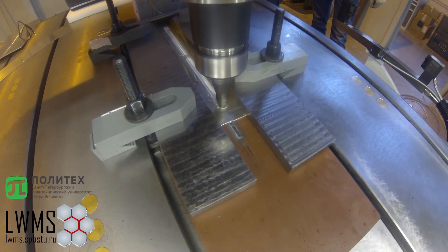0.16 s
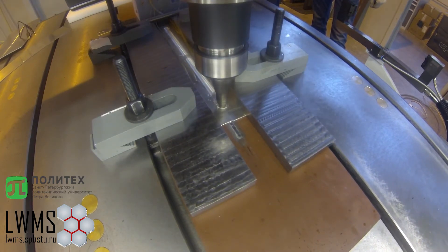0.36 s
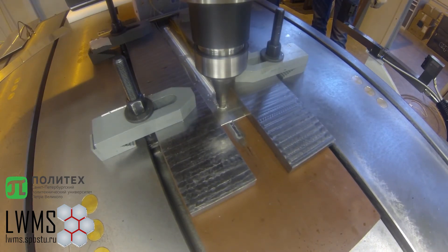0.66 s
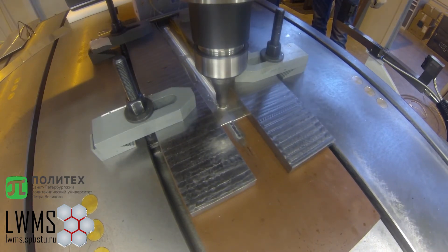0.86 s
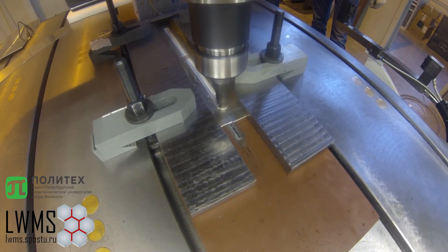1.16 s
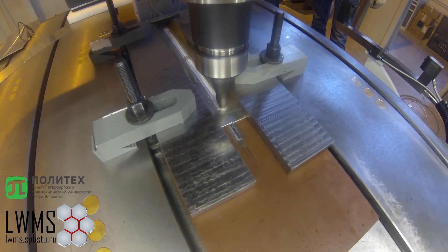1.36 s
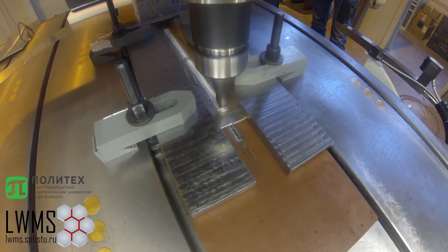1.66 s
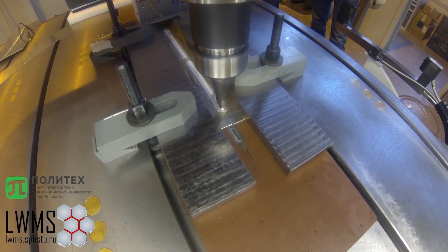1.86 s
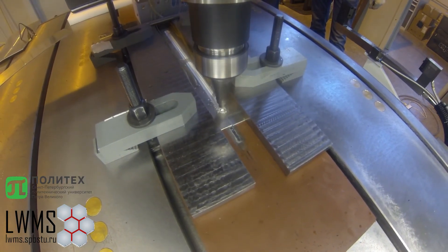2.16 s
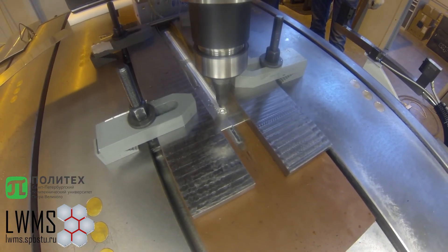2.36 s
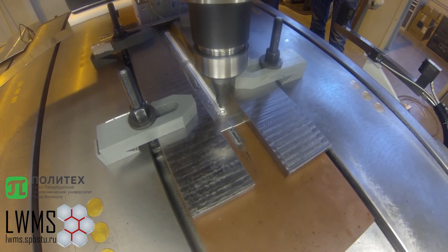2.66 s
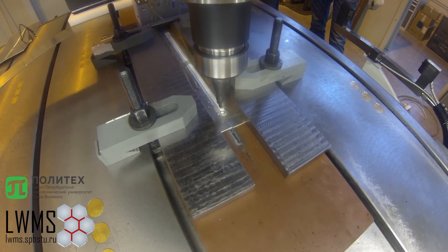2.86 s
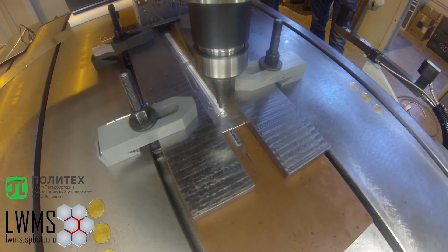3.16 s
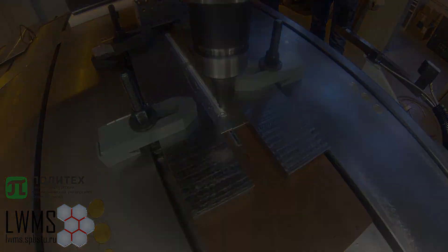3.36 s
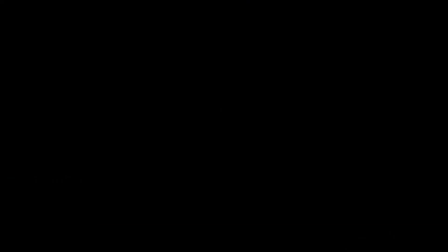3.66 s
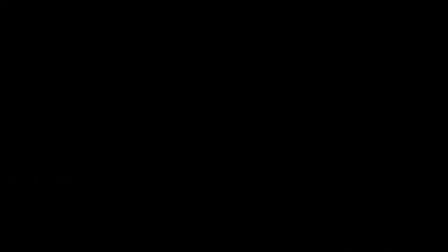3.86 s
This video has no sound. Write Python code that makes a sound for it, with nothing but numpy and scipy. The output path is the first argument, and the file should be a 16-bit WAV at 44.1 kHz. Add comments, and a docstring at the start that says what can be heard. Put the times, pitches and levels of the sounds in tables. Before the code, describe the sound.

A friction welding machine runs close by in a workshop, in mono, with constant bright hiss, fluttering ring and thin whines. A rough high squeal fades until about 3.5 s, then partly returns. The frame shudders low until 0.9 s, when a singing band sags and a jolt falls. A steady low hum grows until 3.2 s, drops in pitch, and a short drive sweep rises and falls at 3.5-3.9 s.

```python
"""Friction stir welding machine

A workshop, heard in mono from close to the tool. Filtered noise makes the hiss, squeal and ringing
of the spindle; wavering sines make its whines. The frame first shudders, then a feed drive hums.
The hum stops as gear tones fall in pitch; a short move then sweeps such tones up and down through
the resonances of the frame. Low jolts, gear noise and faint workshop noise lie underneath."""
import sys
import numpy as np
from scipy import signal
from scipy.fft import rfft, irfft
from scipy.io import wavfile
from scipy.ndimage import uniform_filter1d

SR = 44100
rng = np.random.default_rng(int(sys.argv[2]) if len(sys.argv) > 2 else 0)


def wrap_up_sound(samples):
    """Save the sound to the file named by the first command line argument, as 16-bit audio."""
    columns = np.atleast_2d(samples).T
    # keep every value between -1 and 1, then stretch to whole-number steps
    tamed = np.clip(columns, -1, 1)
    steps = np.round(tamed * 32767).astype(np.int16)
    wavfile.write(sys.argv[1], SR, steps)


N = 176400  # samples, 4 s
SWITCH_S = 0.047  # length of a smooth switch


def amp(db):
    """Decibels to gain."""
    return 10 ** (np.asarray(db) / 20)


def unit(x):
    """Scales to rms 1."""
    return x / np.sqrt(np.mean(x ** 2) + 1e-20)


def clock():
    """Time of every sample, in seconds."""
    return np.arange(N) / SR


def curve(rows, axis=1):
    """One column of a time table, interpolated at every sample."""
    rows = np.array(rows)
    return np.interp(clock(), rows[:, 0], rows[:, axis])


def after(s):
    """Smooth switch from 0 to 1 around time s."""
    return .5 + .5 * np.tanh(2 * (clock() - s) / SWITCH_S)


def drift(width_hz):
    """Random motion of rms 1, made of noise that weakens above width_hz."""
    hz = np.fft.rfftfreq(N, 1 / SR)
    lowpass = (hz > 0) / (1 + (hz / width_hz) ** 2)
    return unit(irfft(rfft(rng.standard_normal(N)) * lowpass, N))


def turn(hz):
    """Unit phasor that follows a frequency from a random starting phase."""
    cycles = np.cumsum(hz * np.ones(N)) / SR
    return np.exp(2j * np.pi * (cycles + rng.random()))


def band(hz, width_hz):
    """Narrow noise of rms 1: a phasor at the centre frequency, randomly modulated."""
    wander = drift(width_hz * .78) + 1j * drift(width_hz * .78)
    return unit((wander * turn(hz)).real)


def tones(rows, flutter=.3):
    """Machine tones that waver in pitch and strength."""
    total = 0
    for hz, db, width_hz in rows:
        tone = unit(turn(hz + .5 * width_hz * drift(width_hz)).real)
        total = total + amp(db) * tone * (1 + flutter * drift(2 * width_hz + 1))
    return total


def noise(points, patch_db, flicker_db, size=1024):
    """Coloured noise of rms 1 with small time-frequency patches and a shared flicker."""
    overlap = size - size // 4
    hz, _, z = signal.stft(rng.standard_normal(N), SR, nperseg=size, noverlap=overlap)
    patches = uniform_filter1d(rng.standard_normal(z.shape), size=8, axis=0)  # across frequency
    patches = unit(uniform_filter1d(patches, size=12, axis=1))  # along time
    f, db = np.transpose(points)
    colour = np.interp(np.log(hz + 1), np.log(f), db)[:, None]
    x = signal.istft(z * amp(colour + patch_db * patches), nperseg=size, noverlap=overlap)[1][:N]
    return unit(x * amp(flicker_db * drift(width_hz=38)))


def reflect(x):
    """Dense short reflections from the table and the workshop comb a sound."""
    t60_s, echo_db = 0.26, -11
    t = np.arange(SR // 2) / SR
    tail = rng.standard_normal(len(t)) * 1000 ** (-t / t60_s)
    tail = tail / np.linalg.norm(tail)
    return unit(x + amp(echo_db) * signal.fftconvolve(x, tail)[:N])


# steady broad hiss of the running machine: f/Hz, relative level/dB per Hz
HISS_COLOUR = [(400, -23.5), (560, -34), (690, -25), (900, -22.5), (1330, -24.5), (1470, -20),
               (2000, -17.5), (2160, -14), (2320, -16), (2850, -8), (3050, -4.5), (3520, -8), (3760, -15),
               (4180, -9), (4800, -12), (5300, -8.5), (5470, -12.5), (5720, -8), (6000, -2.5), (6400, -2),
               (6800, -1), (7130, -19), (7330, -7), (7800, -7), (8520, -18.5), (9000, -12.5), (9650, -21),
               (10450, -10), (10950, -17.5), (11700, -15.5), (12400, -20.5), (12850, -15.5), (13350, -14),
               (13750, -32), (14400, -24), (14750, -18), (15800, -31)]


def hiss():
    """Steady coloured noise of the machine, combed by its reflections."""
    return amp(-32) * reflect(noise(HISS_COLOUR, patch_db=0.88, flicker_db=0.36))


def saturate(x, low_hz, high_hz, count=4):
    """A self-limiting vibration: its strength evens out while its pitch keeps jittering."""
    hz = np.fft.rfftfreq(N, 1 / SR)
    offset = (2 * hz - low_hz - high_hz) / (high_hz - low_hz)  # -1 and 1 at the band edges
    for _ in range(count):
        even = x / (abs(signal.hilbert(x)) + 1e-9)
        x = irfft(rfft(even) / (1 + offset ** 10), N)
    return unit(x)


# rough squeal of the rubbing tool, before it limits itself: f/Hz, relative level/dB per Hz
SQUEAL_COLOUR = [(5000, -47), (5700, -13), (5820, -16.5), (6250, -8), (6430, -11), (6590, 3.5),
                 (6740, -8.5), (6950, -7), (7150, -25), (7550, -10), (8200, -52), (9000, -36)]
# soft rubbing hiss that goes with the squeal: f/Hz, relative level/dB per Hz
RUB_COLOUR = [(5400, -31), (5700, -22), (5850, -1), (6500, -1.5), (7000, -3), (7140, -3), (7320, -2),
              (7560, -2), (7850, -8), (8150, -18), (8800, -35)]
# level of the squeal, which the rubbing follows: t/s, level/dB
SQUEAL_COURSE = [(0, -27), (.4, -26), (1.15, -26.5), (1.9, -29), (2.6, -32), (3.1, -36.5), (3.48, -39.5),
                 (3.62, -33), (3.92, -29), (4, -30)]


def rubbing_tool():
    """The tool squeals as a self-limiting vibration, with a softer rubbing hiss beside it."""
    squeal = saturate(noise(SQUEAL_COLOUR, patch_db=0, flicker_db=0), low_hz=5850, high_hz=7250)
    rub = amp(-9.5) * noise(RUB_COLOUR, patch_db=1, flicker_db=-0.5)
    return amp(curve(SQUEAL_COURSE)) * (squeal + rub)


# singing band, weakening and sagging as it stops: t/s, centre f/Hz, level/dB
SING_COURSE = [(0, 2735, -34.5), (.7, 2740, -38.5), (.79, 2720, -35), (.85, 2630, -43)]


def singing():
    """A narrow noise band sings, then sags in pitch and stops."""
    end_s, width_hz = 0.87, 55
    level = amp(curve(SING_COURSE, axis=2)) * (1 - after(end_s))
    return level * band(curve(SING_COURSE), width_hz)


# fluttering ring of the spindle: t/s, centre f/Hz, level/dB
RING_COURSE = [(0, 3130, -38.5), (1, 3110, -38.5), (2, 3078, -37.5), (3.2, 3087, -38.5), (4, 3010, -36)]


def ringing():
    """The spindle's ring flutters because it is a narrow band of noise."""
    return amp(curve(RING_COURSE, axis=2)) * band(curve(RING_COURSE), width_hz=117)


# hiss band that sinks slowly: t/s, centre f/Hz, level/dB
SINKING_COURSE = [(0, 5300, -50.5), (1.8, 5290, -44.5), (3.1, 5030, -43.5), (3.7, 4910, -42.5),
                  (4, 4780, -41.5)]


def sinking_band():
    """A noise band grows stronger while its centre sinks."""
    return amp(curve(SINKING_COURSE, axis=2)) * band(curve(SINKING_COURSE), width_hz=200)


# steady whines of spindle and pumps: f/Hz, level/dB, width f/Hz
STEADY_WHINES = [(436, -62, 6), (1211, -66, 5), (1400, -67, 8), (1590, -66, 8), (1905, -62, 20),
                 (2025, -57, 6), (2620, -55, 14), (2744, -54, 6), (2800, -52, 4), (2827, -56, 6),
                 (3015, -53, 12), (5600, -51, 4), (6577, -43, 5), (7532, -55, 10), (7720, -45.5, 2)]
# beating pair of whines: f/Hz, level/dB before the course below, width f/Hz
BEATING_PAIR = [(1091.7, -55.5, 13), (1119.6, -58, 5.2)]
# gain on the pair: t/s, level/dB
BEATING_COURSE = [(0, 4.5), (.4, -1), (.9, -1), (4, -3.5)]


def whines():
    """Wavering tones of the spindle and pumps, with two close tones that beat."""
    return tones(STEADY_WHINES) + amp(curve(BEATING_COURSE)) * tones(BEATING_PAIR)


# low workshop noise: f/Hz, relative level/dB per Hz
ROOM_COLOUR = [(10, -8), (30, 9), (90, -12.5), (150, -10), (230, -30), (450, -7.5), (600, -6), (900, -27)]


def room():
    """Faint low noise of the workshop, patchy and flickering."""
    return amp(-51) * noise(ROOM_COLOUR, patch_db=1.5, flicker_db=2.0)


# low shudder of the frame before the feed starts: f/Hz, level/dB, width f/Hz
SHUDDER_TONES = [(23, -38.5, 0.25), (34.77, -49, 2.5), (49.1, -47.5, 5), (70.4, -51.5, 1.5),
                 (105.5, -54.5, 22)]
# frame tones that beat while it shudders: f/Hz, level/dB, width f/Hz
BEATING_STRANDS = [(300.5, -44, 7.8), (333.6, -43.5, 14.5), (354, -49, 12.2)]


def shudder():
    """The frame shakes on low tones and beats on higher ones until it settles."""
    end_s = .95
    return (1 - after(end_s)) * (tones(SHUDDER_TONES, flutter=.1) + tones(BEATING_STRANDS))


# gear noise in the frame's resonance: t/s, level/dB
GEAR_COURSE = [(0, -42), (.85, -39.5), (.95, -45.5), (1.1, -43.5), (2, -47), (3.12, -47), (3.22, -40),
               (3.33, -40.5), (3.41, -47.5), (3.5, -41.5), (3.58, -35.5), (3.78, -38.5), (3.87, -39),
               (3.93, -46.5), (4, -48)]


def gear_noise():
    """Gear noise heard through one resonance of the frame."""
    return amp(curve(GEAR_COURSE)) * band(hz=326.2, width_hz=78.3)


# whines of the engaged drive: f/Hz, level/dB, width f/Hz
DRIVE_WHINES = [(597, -61, 5), (2146, -57, 6), (2157, -53.5, 4), (2167, -58, 8), (2220, -61, 10),
                (2261, -61, 6), (2438, -53, 7)]
# thin whine that sets in with the drive and weakens: t/s, level/dB
THIN_COURSE = [(.83, -57.5), (1.9, -57.5), (3.1, -65.5), (3.4, -65)]


def engaged_drive():
    """The drive sets in with wavering whines and one thin tone that weakens."""
    start_s, thin_hz = 0.78, 821
    thin = amp(curve(THIN_COURSE)) * unit(turn(thin_hz + drift(width_hz=2.6)).real)
    return after(start_s) * (tones(DRIVE_WHINES) + thin)


# low jolts as the axes start and stop: centre t/s, level/dB, length t/s (one sigma)
AXIS_JOLTS = [(0.862, -36.5, 0.031), (1.05, -46, 0.11), (3.449, -41, 0.033), (3.636, -43, 0.064),
              (3.854, -45, 0.032)]


def jolts():
    """Each jolt is a bell-shaped swell of one low, wandering tone."""
    hz, width_hz = 35, 52
    swells = 0
    for s, db, length in AXIS_JOLTS:
        swells = swells + amp(db) * np.exp(-.5 * ((clock() - s) / length) ** 2)
    return swells * unit(turn(hz + .5 * width_hz * drift(width_hz)).real)


# weaker gear tones around the feed hum: f/Hz, level/dB, width f/Hz
FEED_TONES = [(81, -49.5, 0.1), (92.5, -58, 0.17), (253, -63, 1), (273.2, -57, 0.2), (343.8, -50, 1.9),
              (356.8, -57.5, 0.85), (372, -54.5, 1.2)]


def feed_hum():
    """The feed drive hums on one strong tone that slowly grows louder, among weaker gear tones."""
    start_s, end_s = 0.94, 3.19
    hz, waver = 281.3, 0.0012  # waver: rms fraction of the pitch
    level_db = -35.5 + 0.7 * (clock() - 0.5)  # gains 0.7 dB per second
    main = amp(level_db) * unit(turn(hz * (1 + waver * drift(width_hz=9.9))).real)
    return after(start_s) * (1 - after(end_s)) * (main + tones(FEED_TONES))


def resonate(x, hz, width_hz):
    """One fixed mode with a gain of about 1 at its peak."""
    pole = np.exp(-np.pi * width_hz / SR)
    return 2 * signal.lfilter([1 - pole], [1, -pole * np.exp(2j * np.pi * hz / SR)], x).real


# modes of the frame: f/Hz, width f/Hz, level/dB
FRAME_MODES = [(342.3, 19.5, -3), (242, 21, -12.5), (476, 50, -25), (970, 77, -13), (1480, 110, -15)]


def glide(rows, orders):
    """Gliding gear tones boom whenever they cross a mode of the frame."""
    level = amp(curve(rows, axis=2)) * after(rows[0][0]) * (1 - after(rows[-1][0]))
    gears = sum(amp(db) * unit(turn(k * curve(rows)).real) for k, db in orders)
    drive = level * gears
    return sum(amp(db) * resonate(drive, hz, width_hz) for hz, width_hz, db in FRAME_MODES)


# falling drive tone as the hum stops: t/s, pitch f/Hz, level/dB before gears and frame
BRAKE_COURSE = [(3.13, 284.4, -38), (3.21, 272.5, -30), (3.25, 263, -44.5), (3.295, 260.4, -28.5),
                (3.39, 247, -43)]
# its gear tones: multiple of the pitch, level/dB
BRAKE_GEARS = [(0.999, 4), (1.28, 3.5)]


def brake():
    """The drive's gear tones fall in pitch through the frame's modes."""
    return glide(BRAKE_COURSE, BRAKE_GEARS)


# drive tone rising and falling in the short move: t/s, pitch f/Hz, level/dB before gears and frame
MOVE_COURSE = [(3.51, 205.3, -40), (3.552, 244.6, -13), (3.593, 349.5, -17), (3.628, 400, -26),
               (3.66, 413.4, -27), (3.694, 347, -18), (3.742, 242, -21.5), (3.805, 224, -38),
               (3.87, 166, -47)]
# its gear tones: multiple of the pitch, level/dB
MOVE_GEARS = [(1, 1.5), (1.48, -17), (2, -17.5), (4, -20.5)]


def short_move():
    """The drive's gear tones sweep up and down through the frame's modes."""
    return glide(MOVE_COURSE, MOVE_GEARS)


def scene():
    """All sources, the same in both channels."""
    spindle = hiss() + rubbing_tool() + singing() + ringing() + sinking_band() + whines()
    frame = shudder() + gear_noise() + jolts()
    drive = engaged_drive() + feed_hum() + brake() + short_move()
    mono = spindle + room() + frame + drive
    return np.array([mono, mono])


def record(dry):
    """The recorder's band limit: a steep low-pass at 15850 Hz."""
    lowpass = signal.firwin(511, 15850, window=("kaiser", 9), fs=SR)
    return signal.oaconvolve(dry, lowpass[None], "same")


dry = scene()
out = record(dry)
wrap_up_sound(out)
```